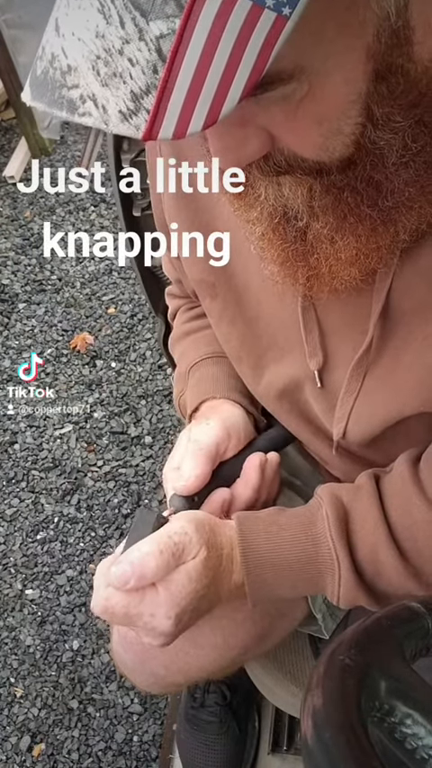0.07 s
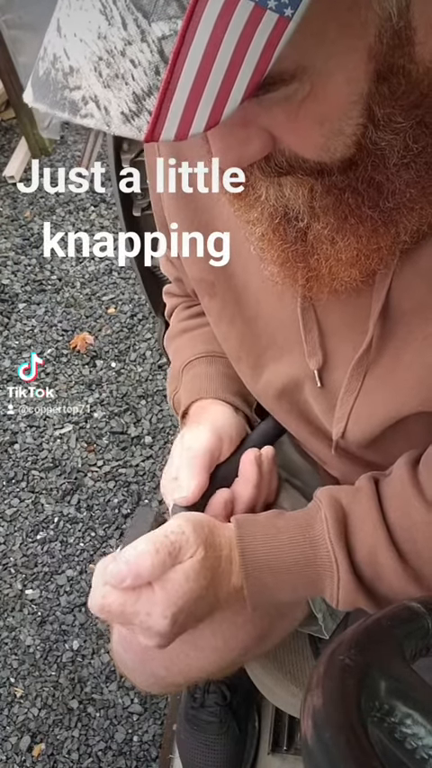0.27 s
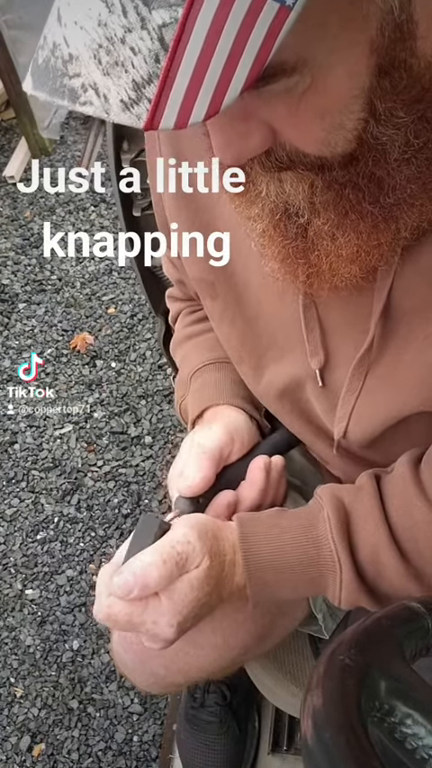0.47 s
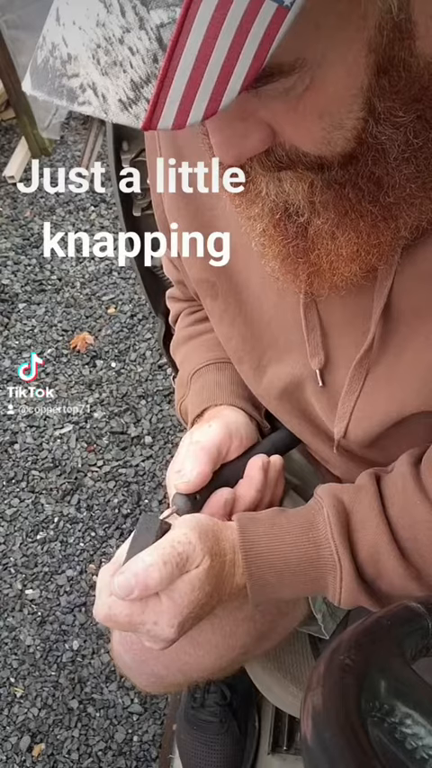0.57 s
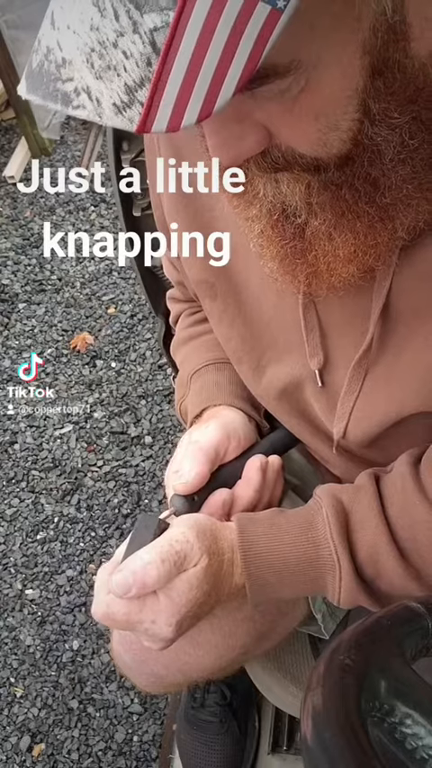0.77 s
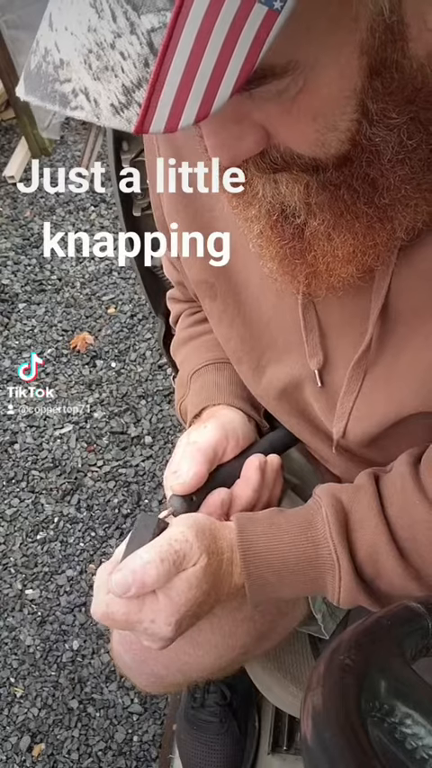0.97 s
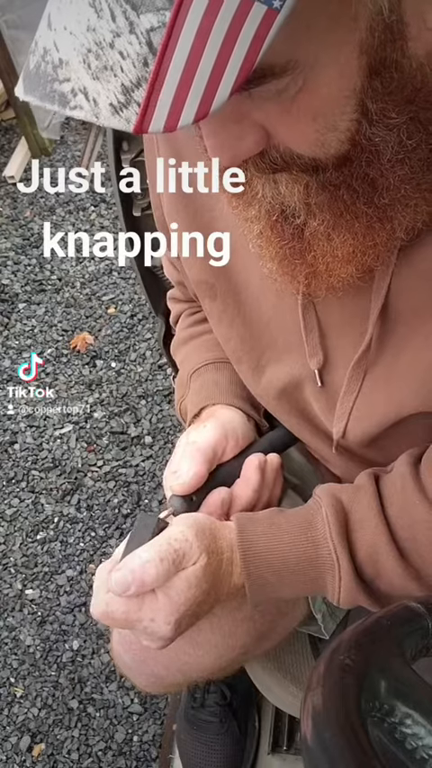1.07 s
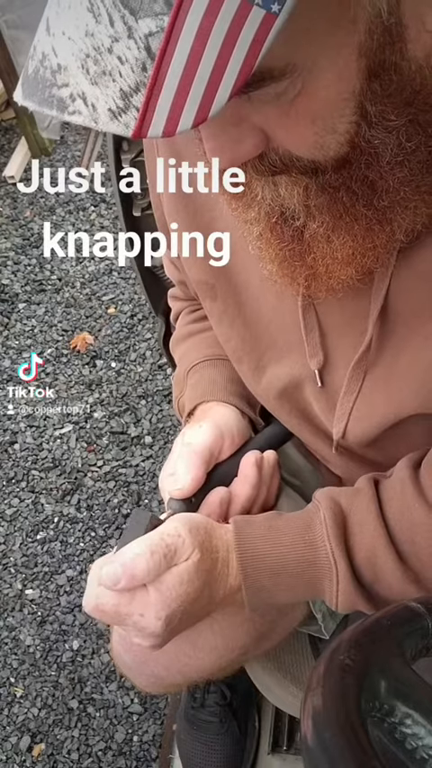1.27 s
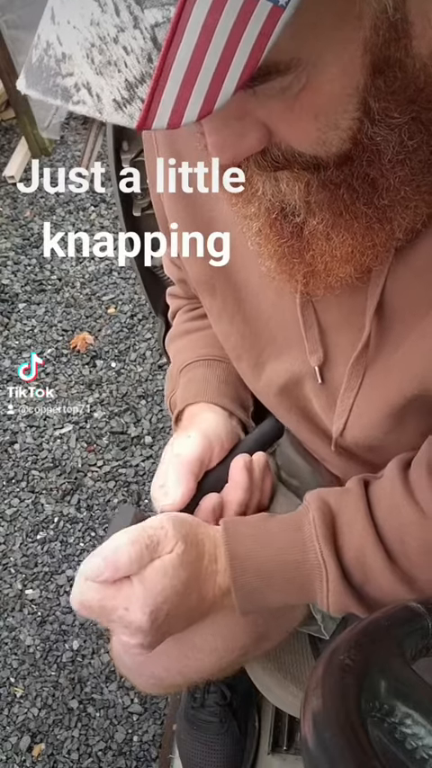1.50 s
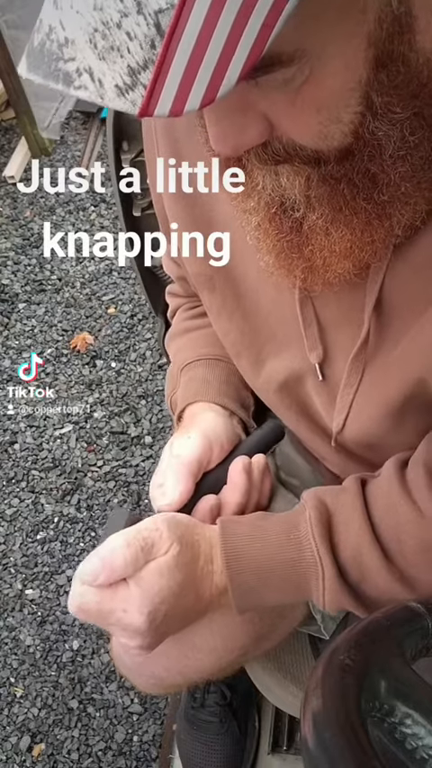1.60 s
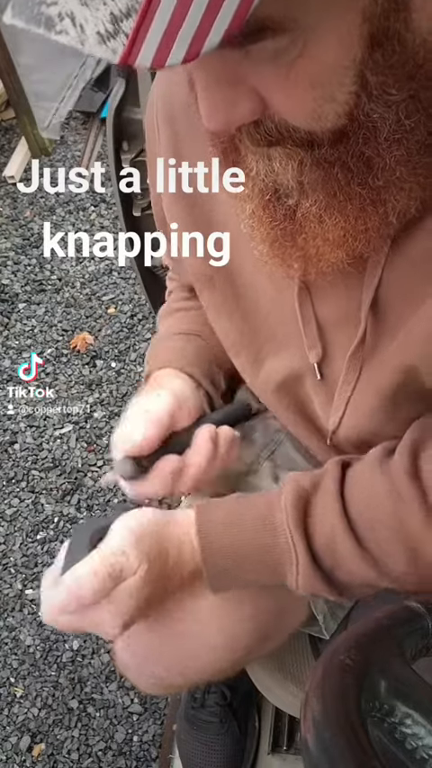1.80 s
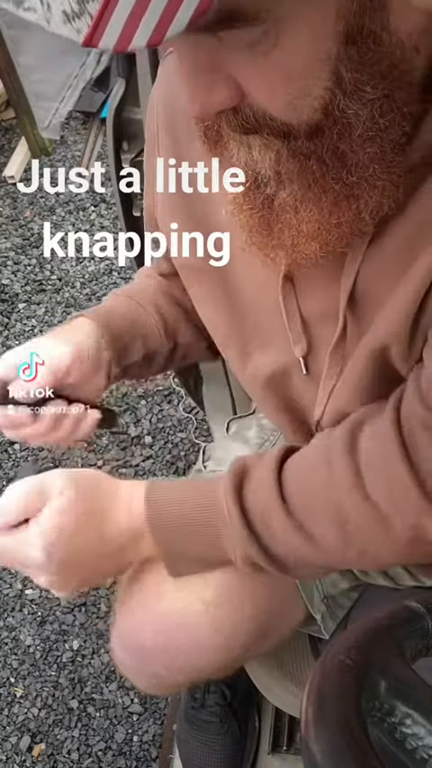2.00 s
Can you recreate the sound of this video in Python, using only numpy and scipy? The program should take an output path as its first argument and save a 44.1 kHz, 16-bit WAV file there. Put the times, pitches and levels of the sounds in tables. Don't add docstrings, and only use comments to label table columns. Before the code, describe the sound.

Close, dry, bright snap of a flake pressed off stone at 0.2 s, with a very short stony ring, scattering grit and a dull hand thud. Quiet tool ticks and a faint scrape near 0.5 s; barely audible bird whistles, clearest around 0.9 s. A second, grittier, fuller snap at 1.5 s, then light scrapes and a soft gravel scuff near 2 s. Distant traffic and idling engine hum throughout.

```python
import sys
import numpy as np
from scipy import signal
from scipy.io import wavfile
from scipy.ndimage import uniform_filter1d

SR = 44100
rng = np.random.default_rng(int(sys.argv[2]) if len(sys.argv) > 2 else 0)


def linear_from_db(decibels):
    return 10 ** (np.asarray(decibels, float) / 20)


def dump_mix(stems):
    frames = np.atleast_2d(stems).T
    limited = np.clip(frames, -1, 1)
    pcm = np.round(limited * 32767).astype(np.int16)
    wavfile.write(sys.argv[1], SR, pcm)


N = 90404


def evened(x):
    return x / np.sqrt(np.mean(x ** 2) + 1e-20)


def read(points, hz):
    f, value = np.transpose(points)
    return np.interp(np.log(hz + 1), np.log(f + 1), value)


def sides(pan_db):
    ratio = linear_from_db(pan_db)
    return np.array([2 * ratio / (1 + ratio), 2 / (1 + ratio)])


def noise(shape, pan, same, patchy_db, size=1024):
    hz = np.fft.rfftfreq(size, 1 / SR)
    frames = 4 * N // size + 5
    a, b, c, d, patches = rng.standard_normal((frames, len(hz), 5)).T
    patches = uniform_filter1d(patches, size=10, axis=0)
    patches = evened(uniform_filter1d(patches, size=12, axis=1))
    like = np.clip(read(same, hz), 0, 1)[:, None]
    left = a + 1j * b
    right = like * left + np.sqrt(1 - like ** 2) * (c + 1j * d)
    inside = (hz >= shape[0][0]) & (hz <= shape[-1][0])
    port_gain = (sides(read(pan, hz)) * inside)[:, :, None]
    spectra = np.array([left, right]) * port_gain
    spectra = spectra * linear_from_db(read(shape, hz)[:, None] + patchy_db * patches)
    x = signal.istft(spectra, nperseg=size, noverlap=3 * size // 4)[1]
    x = x[:, size // 2:size // 2 + N]
    return x / np.sqrt(np.mean(x.mean(0) ** 2))


def struck(s, rise_s, t60_s, hold_s=0):
    t = np.arange(N) / SR - s
    return np.exp(np.minimum(t + hold_s, 0) / rise_s) * linear_from_db(-60 * np.maximum(t, 0) / t60_s)


def ring(s, hz, db, rise_s, t60_s, pan_db, hold_s=0):
    t = np.arange(N) / SR - s + hold_s / 2
    envelope = linear_from_db(db) * struck(s, rise_s, t60_s, hold_s)
    return sides(pan_db)[:, None] * envelope * np.cos(2 * np.pi * hz * t)


def just_before(s, length_s):
    u = np.clip((np.arange(N) / SR - s) / length_s + 1, 0, 1)
    return np.minimum(4 * u, 1) * (u < 1)


def bump(centre_s, length_s):
    t = np.arange(N) / SR
    return np.exp(-(2 * (t - centre_s) / length_s) ** 2)


# hz, left_minus_right_db
FAR_PAN = [(60, -8.5), (250, -4.5), (900, -3), (1700, -11.5), (2300, -3), (3000, 2.5), (4500, 15),
           (8000, 4)]
# hz, likeness_0_to_1
FAR_LIKENESS = [(60, 0.66), (180, 0.69), (550, 0.44), (1650, 0.21), (4970, 0.22), (15000, 0.03)]
# hz, level_db_per_hz
RUMBLE = [(20, -18.5), (40, -8.5), (65, -2.5), (90, -9), (105, -16.5), (200, -19), (320, -25.5),
          (900, -34.5)]
# hz, level_db_per_hz
TYRE_HISS = [(900, -11), (1250, -10), (1900, 1.5), (2600, -13), (5600, -19.5), (7000, -30), (14800, -28.5),
             (16100, -40)]
# start_s, pitch_hz, level_db
ENGINE = [(0.0, 81.9, -73.5), (0.23, 76.1, -62), (0.58, 78, -71), (0.71, 67.58, -66), (1.22, 67.43, -62),
          (1.33, 78.54, -61), (1.45, 71.1, -74), (1.52, 78.9, -63.5), (1.68, 83, -59), (1.729, 70.8, -57.5),
          (1.94, 68.37, -67.5), (2.05, 61.7, -57.5)]
RUMBLE_DB, TYRE_HISS_DB = -63.5, -79
HUM_HZ, HUM_DB = 119.8, -67.5


def background():
    t = np.arange(N) / SR
    waver = evened(uniform_filter1d(rng.standard_normal((2, N)), size=4000))
    hum = linear_from_db(HUM_DB + .6 * waver[0]) * np.sin(2 * np.pi * HUM_HZ * t)
    s, hz, db = np.transpose(ENGINE)
    phase = 2 * np.pi * np.cumsum(np.interp(t, s, hz)) / SR
    engine = linear_from_db(np.interp(t, s, db) + 1.524 * waver[1]) * np.sin(phase)
    rumble = linear_from_db(RUMBLE_DB) * noise(RUMBLE, FAR_PAN, FAR_LIKENESS, patchy_db=3.5, size=4096)
    hiss = linear_from_db(TYRE_HISS_DB) * noise(TYRE_HISS, FAR_PAN, FAR_LIKENESS, patchy_db=.5)
    return rumble + hiss + sides(-10)[:, None] * hum + sides(-8)[:, None] * engine


# start_s, length_s, from_hz, to_hz, level_db
WHISTLES = [
    (.02, .14, 3880, 4200, -91),
    (.58, .04, 4200, 4260, -99),
    (.65, .04, 4200, 4250, -97),
    (.83, .06, 3950, 4030, -90),
    (.89, .06, 4050, 4250, -95),
    (.95, .04, 4400, 4520, -95),
    (.995, .02, 4250, 4100, -92),
]
BIRD_GAIN_DB = 3


def bird():
    t, out = np.arange(N) / SR, np.zeros(N)
    flutter = linear_from_db(3.1 * evened(uniform_filter1d(rng.standard_normal(N), size=300)))
    for s, length_s, from_hz, to_hz, db in WHISTLES:
        u = np.clip((t - s) / length_s, 0, 1)
        phase = 2 * np.pi * np.cumsum(from_hz + (to_hz - from_hz) * u) / SR
        out += linear_from_db(db) * np.sin(np.pi * u) ** 0.31 * np.sin(phase)
    return sides(8)[:, None] * linear_from_db(BIRD_GAIN_DB) * out * flutter


# start_s, level_db, jolt_db, grit_db, sizzle_db
SNAPS = [
    (0.2174, -11.5, -1.5, -4.5, 10.5),
    (1.5028, -10, 1.5, 1, 3),
]
# run_s, grit_t60_s, bright_grit_t60_s, lead_in_s, whisper_db, rebound_db
RELEASE = [
    (.0009, .07, 0.079, 0.017, 16, 4),
    (.001, .07, .07, .015, -9.5, 6.5),
]
# hz, level_db
CRACK = [(400, -30), (1500, -27.5), (3700, -12), (6100, -14.5), (7000, -19), (11000, -30.5), (14000, -22),
         (16000, -28.5)]
# hz, left_minus_right_db
NEAR_PAN = [(300, -5), (800, -5.5), (1600, -15.5), (2300, 5.5), (3500, 15), (5000, 21), (7000, 27),
            (16000, 19.5)]
# hz, left_minus_right_db
TAIL_PAN = [(300, -4.5), (900, -2.5), (1500, -10), (2300, 6), (3500, 13.5), (5000, 17.5), (9000, 19),
            (16000, 18.5)]
CRACK_DB, CRACK_T60_S = -20, .014
RUN_RISE_S = .00045
SWELL_HZ, SWELL_DB, SWELL_S = 4150, -28, .007
LEAD_IN_DB = -49.5
WHISPER_DB, WHISPER_S, WHISPER_LEAD_S = -86.5, .020, .012


def cracks():
    crack = noise(CRACK, NEAR_PAN, [(100, 1.0), (16000, 0.61)], patchy_db=-2.5)
    whisper = noise([(5500, -4.5), (8000, 0), (11000, -9.5), (15000, -0.5), (16200, -8.5)],
                    TAIL_PAN, [(100, .5), (16000, .5)], patchy_db=4.5)
    out = np.zeros((2, N))
    for (s, db, _, _, _), (run_s, _, _, lead_in_s, whisper_db, _) in zip(SNAPS, RELEASE):
        out += ring(s, SWELL_HZ, db + SWELL_DB, .008, .003, 20) * just_before(s, SWELL_S)
        out += linear_from_db(LEAD_IN_DB) * crack * just_before(s, lead_in_s) * struck(s, .008, 1)
        out += linear_from_db(WHISPER_DB + whisper_db) * whisper * just_before(s - WHISPER_LEAD_S, WHISPER_S)
        out += linear_from_db(db + CRACK_DB) * crack * struck(s + run_s / 2, RUN_RISE_S / 2, CRACK_T60_S, run_s)
    return out


# pitch_hz, level_db, t60_s, left_minus_right_db
STONE = [
    [(245.4, -37, .05, -9.5), (516, -46, 0.03, -5), (2135, -19.5, .015, 0), (1000, -36.5, 0.056, -9),
     (1195, -31, .03, -15), (1743, -19.5, 0.026, -20), (2880, -13, 0.00802, 14.5),
     (3620, -10.5, .014, 12.5), (3746, 1, .004, 16), (3250, -18, .008, 13), (4710, -14.5, 0.0059, 19),
     (5350, -14.5, 0.006, 22), (5900, -20.5, .007, 23)],
    [(251, -26.5, 0.1, -10.5), (468, -26, .04, -1), (591, -30, 0.051, -5.5), (716, -28, 0.06, -3.5),
     (997, -27.5, 0.04, -7.5), (1200, -33.5, .02, -12), (1740, -24.5, .025, -17), (2264, -26.5, 0.037, 2.5),
     (2904, -11.5, 0.0086, 16), (3171, -8.5, .01, 17), (3597, -11.5, 0.025, 17), (4026, -7.5, 0.0085, 19.5),
     (4675, -13, .007, 23.5), (5950, -17.5, 0.0035, 38.5)],
]
# delay_s, level_db
ECHOES = [
    [(.0022, -10.5), (.0043, -16), (.0082, -21), (.013, -24), (0.022, -36.5), (.027, -35.5)],
    [(.0005, -3.5), (.0015, -10), (.005, -19), (.012, -19), (.0175, -26.5), (.028, -31)],
]
GRIP_HZ, GRIP_DELAY_S = 1500, .002
MODE_DB, THROWN_DB, THROWN_FROM_HZ = -8.5, -10.5, 2400


def ringing_stone():
    out = np.zeros((2, N))
    for (s, db, _, _, _), modes, echoes, (run_s, *_) in zip(SNAPS, STONE, ECHOES, RELEASE):
        thrown = np.zeros((2, N))
        for hz, mode_db, t60_s, pan_db in modes:
            late_s = GRIP_DELAY_S * (hz < GRIP_HZ)
            rise_s = RUN_RISE_S + late_s / 2
            out += ring(s + late_s, hz, db + MODE_DB + mode_db, rise_s, t60_s, pan_db, run_s)
            if hz > THROWN_FROM_HZ:
                thrown += ring(s, hz, db + THROWN_DB + mode_db, RUN_RISE_S, t60_s, pan_db * 0.72, run_s)
        for delay_s, echo_db in echoes:
            out += linear_from_db(echo_db) * np.roll(thrown, round(delay_s * SR), axis=1)
    return out


# hz, level_db
GRIT = [(300, -14), (800, -13.5), (2300, -8), (3000, -4.5), (3600, -1), (4300, -3), (6000, -9), (8000, -24)]
# hz, level_db
SIZZLE = [(11500, -20), (13500, 1), (15500, 0), (16200, -14.5)]
# hz, level_db
DUST = [(5000, -7.5), (6500, -1.5), (9000, -3.5), (12000, -8), (16000, -12)]
GRIT_DB, DUST_DB, SIZZLE_DB = -37, -49.5, -62
REBOUND_S, REBOUND_WIDTH_S = .013, .0014
YARD_DB, SIZZLE_TAIL_DB, DUST_TAIL_DB, YARD_T60_S = -62, -77, -76, .22


def scattered_grit():
    grit = noise(GRIT, TAIL_PAN, [(100, 0.81), (16000, 1.0)], patchy_db=-3.5)
    sizzle = noise(SIZZLE, TAIL_PAN, [(100, .5), (16000, .5)], patchy_db=0.0)
    yard = noise(GRIT, TAIL_PAN, [(100, .5), (16000, .2)], patchy_db=1)
    dust = noise(DUST, NEAR_PAN, [(100, .8), (16000, .8)], patchy_db=3.0, size=256)
    t, out = np.arange(N) / SR, np.zeros((2, N))
    for (s, _, _, grit_db, sizzle_db), release in zip(SNAPS, RELEASE):
        _, grit_t60_s, bright_t60_s, _, _, rebound_db = release
        rebound = linear_from_db(rebound_db * np.exp(-((t - s - REBOUND_S) / REBOUND_WIDTH_S) ** 2))
        coarse = linear_from_db(grit_db + GRIT_DB) * grit
        bright = linear_from_db(grit_db + DUST_DB) * dust + linear_from_db(sizzle_db + SIZZLE_DB) * sizzle
        out += rebound * coarse * struck(s, .0005, grit_t60_s)
        out += rebound * bright * struck(s, .0005, bright_t60_s)
        tail = linear_from_db(grit_db + YARD_DB) * yard + linear_from_db(SIZZLE_TAIL_DB) * sizzle + linear_from_db(DUST_TAIL_DB) * dust
        out += tail * struck(s, .002, YARD_T60_S)
    return out


# delay_s, pitch_hz, level_db, t60_s, left_minus_right_db
JOLT = [
    (.003, 138.5, -40.5, 0.079, -5.5),
    (.021, 55, -38.5, .1, -11.5),
    (.03, 36, -51, .3, -15.5),
]


def jolts():
    out = np.zeros((2, N))
    for s, _, jolt_db, _, _ in SNAPS:
        for delay_s, hz, mode_db, t60_s, pan_db in JOLT:
            out += ring(s + delay_s + .25 / hz, hz, jolt_db + mode_db, .4 / hz, t60_s, pan_db)
    return out


# centre_s, length_s, level_db
SCRAPES = [
    (.28, 0.081, -82),
    (0.508, 0.092, -86),
    (1.463, .04, -88),
    (1.57, 0.091, -95),
    (1.755, 0.13, -83),
    (1.971, .1, -84.5),
    (2.05, 0.045, -85),
]
# hz, level_db
SCRAPE = [(900, -6.5), (2500, 6.5), (5000, 0), (8000, -18), (13000, -9.5), (16000, -14.5)]
# hz, level_db
SQUEAK = [(4500, -12), (4800, 7), (5250, -14), (5700, -5), (6050, -29), (6350, 0), (6600, -20)]
# start_s, pitch_hz, level_db, t60_s
TICKS = [
    (.489, 2750, -74.5, 0.023),
    (.489, 3950, -77, 0.014),
    (.718, 4860, -76.5, 0.0092),
    (1.567, 2950, -67.5, 0.031),
]
SQUEAK_S, SQUEAK_LENGTH_S, SQUEAK_DB = 0.54, 0.16, -90.5


def handling():
    stroke = sum(linear_from_db(db) * bump(s, length_s) for s, length_s, db in SCRAPES)
    grain = linear_from_db(1.5 * evened(uniform_filter1d(rng.standard_normal(N), size=150)))
    out = noise(SCRAPE, TAIL_PAN, [(100, 0.65), (16000, 0.3995)], patchy_db=2.0) * stroke * grain
    squeak = noise(SQUEAK, TAIL_PAN, [(100, .6), (16000, .6)], patchy_db=3.5)
    out += linear_from_db(SQUEAK_DB) * squeak * bump(SQUEAK_S, SQUEAK_LENGTH_S)
    return out + sum(ring(s, hz, db, 0.0014, t60_s, 18) for s, hz, db, t60_s in TICKS)


# hz, level_db
SCUFF = [(90, -3), (200, 3.5), (500, -12), (1200, -20.5)]
SCUFF_S, SCUFF_LENGTH_S, SCUFF_DB = 1.994, 0.17, -69.5


def boot_scuff():
    gravel = noise(SCUFF, FAR_PAN, FAR_LIKENESS, patchy_db=5.5)
    return linear_from_db(SCUFF_DB) * gravel * bump(SCUFF_S, SCUFF_LENGTH_S)


def scene():
    snaps = cracks() + ringing_stone() + scattered_grit() + jolts()
    return background() + bird() + snaps + handling() + boot_scuff()


def roll_off(x):
    return signal.sosfilt(signal.butter(12, 16360, fs=SR, output="sos"), x)


KNEE, EDGE_HZ = .7, 16250


def record(dry):
    rounded = KNEE * np.tanh(dry / KNEE)
    edge = signal.firwin(255, EDGE_HZ, window=("kaiser", 8), fs=SR)[None]
    mix = signal.oaconvolve(rounded, edge, "same")
    return roll_off(mix)


dry = scene()
out = record(dry)
dump_mix(out)
```